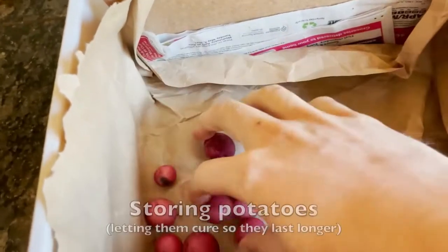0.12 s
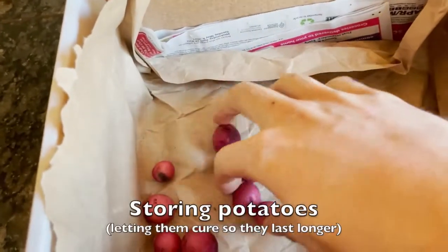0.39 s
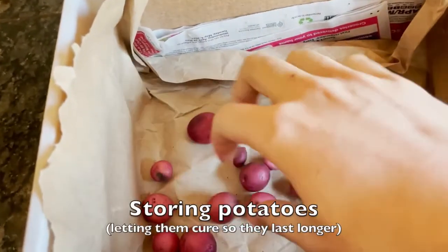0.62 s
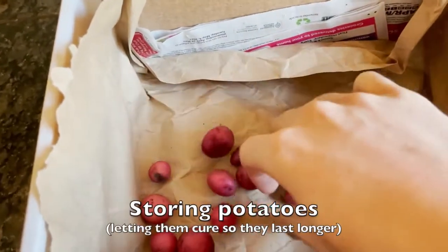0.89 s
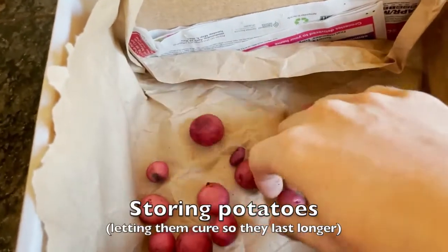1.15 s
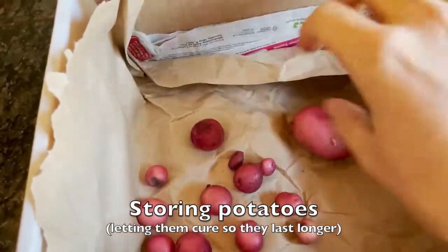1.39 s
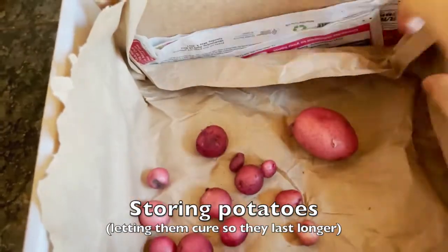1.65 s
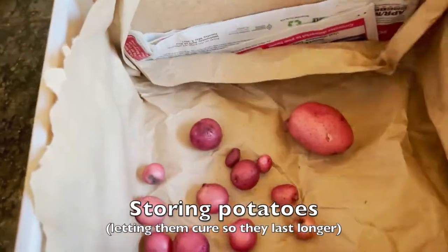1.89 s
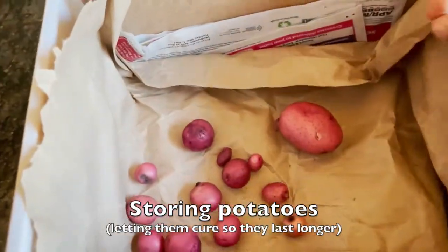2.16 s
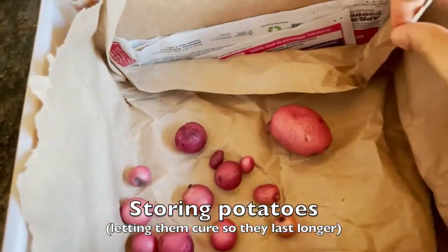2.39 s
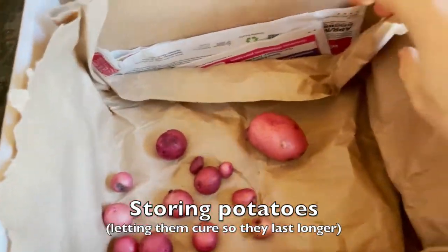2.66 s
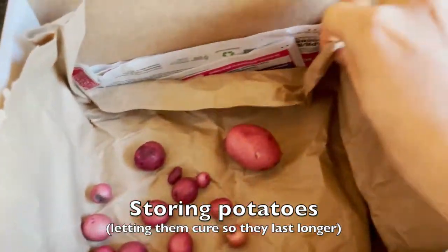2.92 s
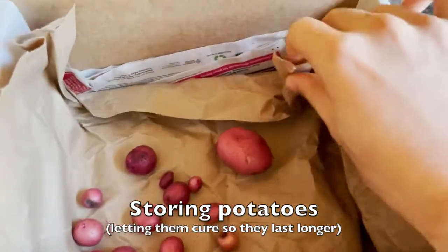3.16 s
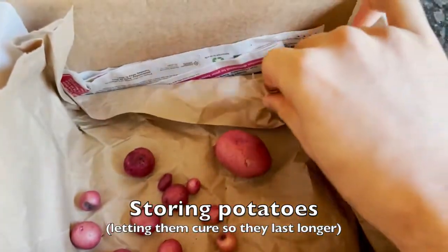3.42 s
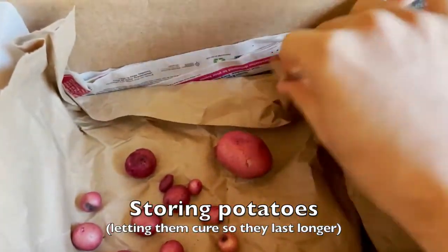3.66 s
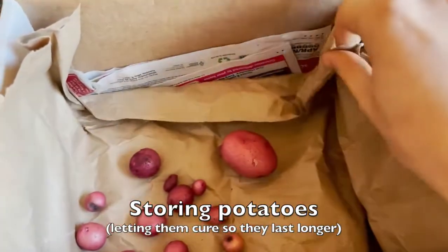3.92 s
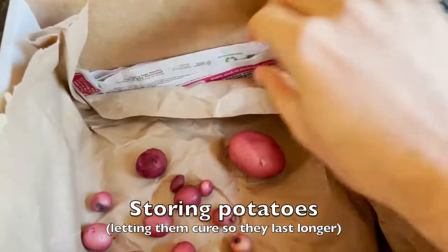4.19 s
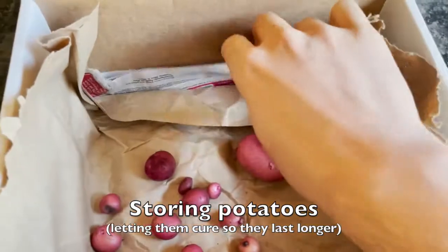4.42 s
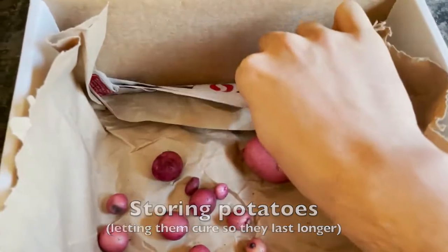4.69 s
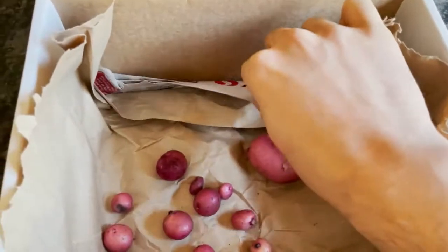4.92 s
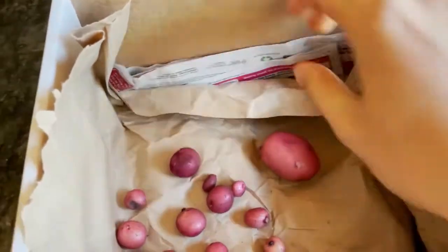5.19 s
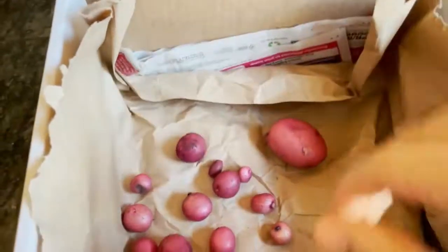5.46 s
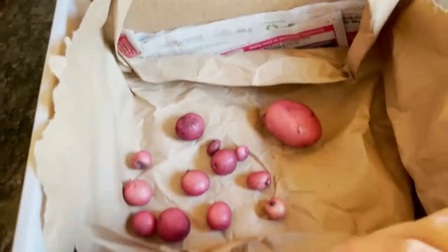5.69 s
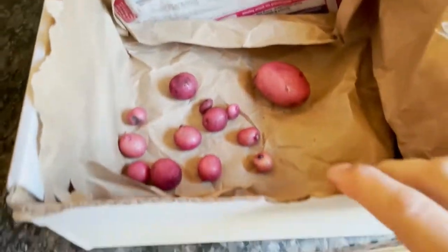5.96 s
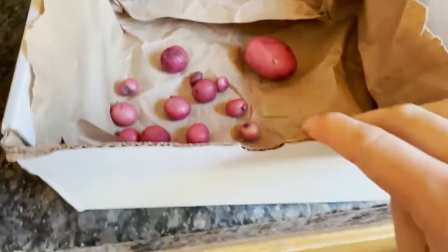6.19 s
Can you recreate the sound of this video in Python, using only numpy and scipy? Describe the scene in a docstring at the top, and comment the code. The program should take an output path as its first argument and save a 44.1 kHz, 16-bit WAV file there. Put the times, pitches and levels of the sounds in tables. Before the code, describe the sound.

Very close indoor sound of a hand working in a paper-lined cardboard box, over low, steady kitchen noise. From 0 to 1.4 s there is a brief brush of paper, then light ticks and small pitched taps as little potatoes are shifted, with a crisp snap near 0.45. After a near pause, bright crackles and a dull drag burst at 1.6-1.75. Rustling continues from 1.8 to 3.4, with sharp snaps at 2.4 and 2.7, a low thump at 3.0 and a tight cluster of crackles to 3.35. It dips around 3.55, then rustle returns with a snap at 3.9. From 4.2 to 4.7 come rumbling drags and hollow knocks, strongest at 4.44. The loudest woody knock lands at 5.05, followed by quick small bumps to 5.15. Then it quiets: soft taps at 5.6, gentle rubbing until 6, faint hiss at the end.

```python
"""Potatoes in a paper-lined box

A hand shifts small potatoes and folds the stiff paper lining of a cardboard box, close to a phone indoors.
Creases snap as noise bursts through resonances; knocks are short pushes that ring panel and box.
Rustle, rubbing and drag are dense random grains under the hand's gestures; jolts are low filtered noise.
A short room tail follows snaps and knocks; behind lie a quiet kitchen's steady noise and a late airy hiss."""
import sys
import numpy as np
from scipy import signal
from scipy.fft import rfft, irfft, next_fast_len
from scipy.io import wavfile
from scipy.ndimage import uniform_filter1d

SR = 44100
rng = np.random.default_rng(int(sys.argv[2]) if len(sys.argv) > 2 else 0)


def wav_out(sig):
    """Save sig, one row per channel (or a flat mono array), as 16-bit PCM at SR to the path in sys.argv[1]."""
    wavfile.write(sys.argv[1], SR, np.round(np.clip(np.atleast_2d(sig).T, -1, 1) * 32767).astype(np.int16))


def how_loud(loudness_db):
    """Turn decibels into a plain amplitude multiplier (0 dB gives 1, 20 dB gives 10)."""
    steps = np.asarray(loudness_db, float) / 20
    return 10 ** steps


N = 279153  # length in samples
T = np.arange(N) / SR
SIZE = next_fast_len(N + SR)
HZ = np.arange(SIZE // 2 + 1) * SR / SIZE


def on_log(table, hz):
    """Logarithmic pitch scale: reads an (f/Hz, value) table on a log-frequency axis."""
    f, v = np.transpose(table)
    return np.interp(np.log(hz + 1), np.log(f + 1), v)


def shape(x, response):
    """Linear filtering: multiplies the spectrum of the whole sound by a frequency response."""
    return irfft(rfft(x, SIZE) * response, SIZE)[..., :N]


def ring(hz, width, f=HZ):
    """Damped simple resonator: its response, with gain 1 at the centre."""
    return 1j * width * f / (hz ** 2 - f ** 2 + 1j * width * f)


def unit(x):
    """Root-mean-square normalisation: scales to rms 1."""
    return x / np.sqrt(np.mean(x ** 2))


def walk(rate):
    """Slow random modulation: levels held for 1 / rate s and slewed, at rms 1."""
    k = int(SR / rate)
    held = np.repeat(rng.standard_normal(N // k + 1), k)
    return unit(uniform_filter1d(held, k)[:N])


# likeness of the two channels: (f/Hz, coherence from 0 to 1)
LIKENESS = [(60, .995), (300, .99), (600, .55), (1400, .72), (2000, .93), (2700, .55), (3700, .75),
            (4600, .5), (5800, .88), (7000, .998), (8200, .998), (9200, .88), (11300, .9), (12800, .72),
            (13400, .998), (14700, .998), (16000, .9)]


def spread(make):
    """Interchannel coherence: two draws of a source become mid and side, balanced at each frequency."""
    c = np.clip(on_log(LIKENESS, HZ), 0, 1)
    mid = shape(make(), np.sqrt((1 + c) / 2))
    side = shape(make(), np.sqrt((1 - c) / 2))
    return np.array([mid + side, mid - side])


SLIP_SCATTER_DB, SLIP_MS = 1.7, 3.0  # scatter of the slips, decay time of one slip
SWELL_DB = 1.0  # slow drift of the slip noise


def grains(rate, scatter_db, ms):
    """Stick-slip friction: noise jumps at each tiny slip of the fibres and dies away in a few ms."""
    slips = (rng.random(N) < rate / SR) * how_loud(scatter_db * rng.exponential(size=N))
    fade = np.exp(-1000 / (ms * SR))
    envelope = signal.lfilter([1], [1, -fade], slips)
    return unit(rng.standard_normal(N) * envelope)


def swelling_grains(rate):
    """Modulated friction: slip noise whose level drifts slowly."""
    return grains(rate, SLIP_SCATTER_DB, SLIP_MS) * how_loud(SWELL_DB * walk(25))


def curves(table):
    """Linear interpolation: the columns of a (t/s, value, ..) table, sample by sample."""
    s, *columns = np.transpose(table)
    return [np.interp(T, s, c) for c in columns]


EDGE_DB = 35  # how far an event has sunk at the ends of its length
ROUNDNESS = 1.26  # 1 = pointed peak, 2 = round top with sudden ends


def swells(s, length, db, rise, bed_db):
    """Power addition: gain of a bed plus events that climb to a peak and sink; rise = share of the length."""
    t, power = T[::32], 0
    for at, span, top in zip(s, length, db):
        late = (t - at) / max(span, .02)
        distance = np.maximum(-late / rise, late / (1 - rise))
        power = power + how_loud(2 * top - 2 * EDGE_DB * distance ** ROUNDNESS)
    return np.sqrt(how_loud(2 * bed_db) + np.interp(T, t, power))


def follow(grip_db, at_60_db, slope):
    """Power law: a bed of level at_60_db at a grip of -60 dB, changing by slope dB per dB of grip."""
    return at_60_db + slope * (grip_db + 60)


def add(out, s, sound):
    """Superposition: mixes a short sound in at s seconds."""
    i = int(s * SR)
    out[..., i:i + sound.shape[-1]] += sound[..., :N - i]


BEND_MS = 1.518  # travel time of a 1 kHz bending wave through the cardboard


def bending(f, first_hz):
    """Dispersion of bending waves: treble arrives first; delays count from the arrival of first_hz."""
    low = np.minimum(f, first_hz)
    turns = BEND_MS / 1000 * (2 * np.sqrt(1000 * low) - low * np.sqrt(1000 / first_hz))
    return np.exp(-2j * np.pi * turns)


TICK_DB, TICK_MS = 11.5, 1.157  # main break inside a snap: mean level over the splinters, delay
SNAP_FADE_MS, SPLINTER_DB = 1.92, 2.5  # main decay time, scatter of the tiny cracks in one snap
# creases snapping: (t/s, sheet level/dB, sheet f/Hz, body level/dB, sizzle level/dB)
SNAPS = [(0.063, -55, 2000, -63, -50.5), (0.3072, -56, 1150, -81, -84), (0.3278, -44, 1310, -46, -50.5),
         (0.41, -68, 1780, -61, -54), (0.4639, -32, 3240, -42, -33.5), (0.492, -54, 1100, -69, -59),
         (0.5195, -55, 5600, -70, -73), (0.622, -57.5, 1180, -62, -62), (0.6604, -81, 4580, -76, -56),
         (0.7071, -51, 1020, -45.5, -66), (0.733, -75, 4800, -75, -53.5), (0.758, -66, 1173, -58, -53),
         (0.7806, -47.5, 1300, -49, -68), (0.818, -65, 2660, -74, -54), (0.859, -72, 2500, -73, -59),
         (0.9109, -49, 1080, -45.5, -61), (0.947, -61, 1710, -76, -72), (1.045, -60.5, 1830, -62.5, -55),
         (1.1193, -83, 4840, -73, -57.5), (1.1465, -61, 5050, -65, -53.5), (1.1742, -67, 6100, -84, -59),
         (1.1986, -67, 1210, -78, -58), (1.2538, -60.5, 1150, -46.5, -86), (1.279, -71, 3300, -83, -71),
         (1.39, -90, 3000, -83, -71), (1.431, -71, 3300, -77, -67), (1.4507, -71, 3400, -96.5, -62),
         (1.472, -74, 5500, -76, -64.5), (1.498, -55, 2300, -79, -55), (1.585, -42.5, 3100, -62, -67),
         (1.6555, -34, 2380, -43.5, -33.5), (1.7, -33.5, 2280, -56, -29), (1.7074, -33.5, 1090, -66, -44),
         (1.782, -65, 2500, -66, -61), (2.129, -54, 2900, -59, -66), (2.4003, -29, 3500, -94, -67),
         (2.475, -59, 4710, -47.5, -49), (2.4893, -46.5, 2660, -45.5, -68.5),
         (2.5458, -43.5, 1900, -62, -47.5), (2.636, -55.5, 2500, -73, -51), (2.6895, -29, 2100, -38, -27),
         (2.695, -41, 2000, -42, -37), (2.721, -57, 1216, -67, -48), (2.795, -47, 1430, -60, -83),
         (2.8235, -43.5, 2280, -46, -69), (2.848, -49, 5340, -52, -64), (2.9145, -34.5, 2120, -45, -34),
         (2.9805, -39.5, 1120, -58, -55), (3.0849, -41.5, 1640, -47, -60), (3.1134, -36, 1760, -45, -48),
         (3.142, -33.5, 2470, -37, -30.5), (3.1435, -33.5, 1210, -43, -48), (3.1711, -33.5, 1650, -36, -55),
         (3.1875, -36, 1980, -50, -38.5), (3.189, -37, 5000, -53, -45), (3.2117, -55, 1150, -43, -44.5),
         (3.228, -43.5, 1600, -57, -50), (3.303, -40, 1900, -41, -55), (3.3228, -26.5, 1450, -29.5, -42),
         (3.385, -42, 2400, -51, -78), (3.387, -41, 1480, -45, -74), (3.4353, -52, 1300, -70, -76),
         (3.5075, -66, 1220, -52, -64), (3.6207, -56, 1210, -60, -73), (3.6424, -70, 1360, -44.5, -47.5),
         (3.8372, -39.5, 1220, -44, -74), (3.8866, -28, 2680, -43, -29.5), (4.087, -43, 1400, -43, -76),
         (4.2328, -72, 990, -46, -57), (4.267, -53, 1100, -40, -50), (4.283, -61, 1500, -44, -60),
         (4.303, -46, 2300, -42.5, -56), (4.347, -42, 2700, -41, -50), (4.354, -51, 2900, -59, -55),
         (4.4087, -50, 2300, -49, -68), (4.4367, -39.5, 895, -41.5, -59), (4.5215, -45.5, 2250, -75, -73),
         (4.5276, -42, 1210, -68, -38.5), (4.5674, -47, 1200, -66, -57), (4.5995, -47, 2380, -67, -64),
         (4.7215, -48, 1900, -51.5, -65), (4.8943, -61.5, 2420, -65, -59.5), (4.916, -64, 2360, -69, -71.5),
         (4.9691, -52.5, 1620, -74, -50.5), (5.0516, -33, 2120, -23.5, -60), (5.0525, -32, 2100, -37, -63),
         (5.1018, -51, 1120, -39, -53), (5.308, -69.5, 5500, -83, -68), (5.5832, -54, 3230, -58, -60),
         (5.591, -60, 3280, -64, -62), (5.927, -58, 1950, -78, -64), (5.9692, -62, 4860, -63.5, -80),
         (6.064, -70, 2500, -87.5, -79), (6.074, -67, 5000, -82.5, -80)]


def snaps():
    """Impulsive excitation of resonators: each crease lets go in a few ms and rings the sheet near its pitch."""
    out, t = np.zeros(N), np.arange(2048) / SR
    f = np.arange(1025) * SR / 2048
    fade = np.exp(-1000 * t / SNAP_FADE_MS) + how_loud(-3.0) * np.exp(-t / 0.0069)
    envelope = (1 - np.exp(-t / 0.00023)) ** 2 * fade
    body = (ring(772, 1100, f) ** 4 + how_loud(-4.0) * ring(1022, 400, f) ** 2) * bending(f, 1600)
    sizzle = ring(6000, 5700, f) ** 2 + how_loud(-13.5) * ring(12200, 4900, f) ** 2
    for s, sheet_db, hz, body_db, sizzle_db in SNAPS:
        cracks = how_loud(SPLINTER_DB * np.repeat(np.minimum(rng.exponential(size=128), 3), 16))
        splinters = rfft(envelope * cracks * rng.standard_normal((3, 2048)))
        tick_gain = how_loud(TICK_DB + 2.5 * rng.standard_normal())
        tick = tick_gain * np.exp(-2j * np.pi * f * TICK_MS / 1000)
        sheet = ring(hz, 0.5 * hz, f) ** 2 + how_loud(-9.0) * ring(2200, 2500, f) ** 2
        parts = irfft((splinters + tick) * [sheet, body, sizzle])
        # levels refer to the loudest 128 samples of each part
        parts /= np.sqrt(np.max(uniform_filter1d(parts ** 2, size=128), axis=1, keepdims=True))
        add(out, s, how_loud([sheet_db, body_db, sizzle_db]) @ parts)
    return out


# box walls and cavity: (f/Hz, width/Hz, level/dB)
BOX = [(190.6, 21, 3.5), (272, 41, -0.5), (343, 160, -2), (406, 44, -1), (669, 44, -0.5), (780, 28, -7.5),
       (1120, 98, -19.5)]


def box(f):
    """Modal superposition: the cardboard's resonances together."""
    return sum(how_loud(db) * ring(hz, width, f) for hz, width, db in BOX)


CONTACT_CYCLES = 0.49  # a push lasts for this part of the struck resonance's period
# knocks on the box, and short pitched ticks within some snaps:
# (t/s, peak level/dB, panel or tick f/Hz, nominal ring T60/s, whole-box relative level/dB)
KNOCKS = [(0.246, -49.5, 342, 0.11, -24), (0.334, -46.5, 287, 0.1, -13.5), (0.78, -34.5, 1160, 0.0085, -19),
          (0.911, -40, 1350, 0.0049, -20), (1.599, -40.5, 324, 0.068, 2), (1.71, -28.5, 226, 0.029, -7),
          (2.492, -40, 291, 0.12, -4.5), (2.919, -40, 272, 0.039, -5), (2.9828, -21.5, 228, 0.042, -12),
          (2.999, -29, 151, 0.24, 13), (3.3231, -23, 1070, 0.007, -27), (3.324, -39.5, 385, 0.084, -9),
          (3.329, -29.5, 450, 0.057, 8.5), (3.386, -27.5, 1900, 0.0087, -12), (3.801, -36, 157, 0.085, -4),
          (3.845, -37, 414, 0.023, -32), (3.889, -34.5, 239, 0.15, -4), (4.235, -32, 367, 0.066, -15),
          (4.263, -30.5, 302, 0.08, -11), (4.295, -31.5, 300, 0.084, -9), (4.347, -33.5, 191, 0.13, -5.5),
          (4.4375, -28, 780, 0.012, -24), (4.439, -15.5, 315, 0.036, 1.5), (4.532, -27.5, 297, 0.048, -9.5),
          (4.571, -38.5, 300, 0.046, -4), (4.608, -38.5, 286, 0.072, -15.5),
          (5.0525, -14.5, 843, 0.0084, -14), (5.053, -7, 327, 0.029, 3), (5.084, -36.5, 302, 0.029, -8),
          (5.099, -33.5, 277, 0.024, -2.5), (5.109, -29.5, 234, 0.03, -11), (5.117, -31, 263, 0.04, -1.5),
          (5.126, -34, 330, 0.03, -9), (5.135, -30, 270, 0.025, 0), (5.145, -35, 262, 0.054, -6),
          (5.585, -36.5, 346, 0.056, -1.5), (5.594, -38, 82.5, 0.058, -31), (5.688, -55, 344, 0.084, -23),
          (5.935, -50.5, 467, 0.04, 12)]


def knocks():
    """Forced vibration: a short push rings a panel, or a snap's pitched tick, and the whole box."""
    out, t = np.zeros(N), np.arange(8192) / SR
    f = np.arange(4097) * SR / 8192
    for s, peak_db, hz, t60, box_db in KNOCKS:
        push = np.sin(np.pi * np.clip(t * hz / CONTACT_CYCLES, 0, 1)) ** 2
        width = 2 * np.log(1000) / (np.pi * max(t60, .01))
        # panel and enclosed air are coupled: the squared resonance swells before it dies
        struck = ring(hz, width, f) ** 2
        whole = how_loud(box_db) * box(f) * ring(546, 490, f)
        boom = irfft(rfft(push) * bending(f, 3.3 * hz) * (struck + whole))
        add(out, s, how_loud(peak_db) * boom / np.max(np.abs(boom)))
    return out


FOLD_DB, CRINKLE_DB, FOLD_TOP_DB = 5.5, 3.5, 10  # slow and quick flicker of a resonance; its highest rise
FLAT_DB = -6  # rustle heard between the sheet's resonances
HISS_SCATTER_DB = 2.8  # scatter of the finest slips
# colour of the paper noise: (f/Hz, spectral level/dB)
PAPER = [(710, 2), (1200, -1), (1920, 1.5), (2390, 4.5), (7740, 3.5), (9850, -8), (11200, -8), (15100, -14),
         (16000, -3.5), (16500, -24.5)]
# resonances of the lining: (f/Hz, width/Hz, level/dB before flicker)
SHEET = [(1100, 280, -14.5), (1600, 400, -10.5), (2100, 360, -8), (2620, 250, -12.5), (3000, 140, -10),
         (3530, 90, -14), (4680, 350, -13), (5130, 440, -14), (6100, 330, -20.5)]
# finger strokes over the paper: (peak t/s, length/s, rustle level/dB, fine hiss level/dB)
STROKES = [(0.146, 0.24, -49, -48.5), (0.25, 0.17, -59, -58), (0.372, 0.52, -66, -64),
           (0.536, .3, -64.5, -63), (0.938, 0.29, -65, -61), (1.159, 0.34, -70, -69),
           (1.298, 0.16, -72.5, -72), (1.615, 0.15, -51, -56), (1.693, 0.52, -49.5, -48.5),
           (2.013, 0.35, -54, -59), (2.075, 0.16, -50.5, -50), (2.215, 0.55, -49, -54.5),
           (2.5, 0.8, -51, -55), (2.719, 0.26, -45.5, -47), (2.852, 0.13, -45.5, -47),
           (2.933, 0.56, -49, -52), (3.098, 0.13, -52, -49), (3.191, 0.19, -44, -50),
           (3.275, 0.22, -54, -60), (3.53, 0.078, -69, -65), (3.752, 0.53, -51.5, -54.5),
           (3.94, 0.12, -75, -54), (4.036, 0.063, -51, -49), (4.311, 0.15, -46, -44.5),
           (4.339, 0.084, -46, -48), (4.428, 0.077, -51, -57), (4.48, 0.18, -56.5, -70),
           (4.562, 0.27, -50.5, -53), (4.633, 0.38, -53, -59), (4.883, 0.14, -75, -74),
           (5.094, 0.18, -49, -54.5), (5.122, 0.12, -49, -52.5), (5.28, 0.2, -64, -62.5),
           (5.69, 0.14, -61, -64.5), (5.767, 0.32, -57, -60.5), (5.87, 0.17, -60, -68),
           (5.987, 0.16, -61, -65)]


def strokes(grip_db):
    """Friction noise through changing modes: paper rustles in dense grains, with a finer hiss above."""
    s, length, rustle_db, hiss_db = np.transpose(STROKES)
    colour = how_loud(on_log(PAPER, HZ))
    dull = 1 / (1 + (HZ / 7500) ** 8)
    # as folds form and flatten, each resonance of the sheet comes and goes on its own
    folds = []
    for _, _, db in SHEET:
        flicker = FOLD_DB * walk(18) + CRINKLE_DB * walk(120)
        folds.append(how_loud(db + np.minimum(flicker, FOLD_TOP_DB)))

    def rustling():
        """Time-varying modal sum: slip noise heard directly and through the sheet's resonances."""
        x = shape(swelling_grains(1200), colour * dull)
        modes = sum(gain * shape(x, ring(hz, width) ** 2) for gain, (hz, width, _) in zip(folds, SHEET))
        return unit(how_loud(FLAT_DB) * x + modes)

    rustle = spread(rustling)
    hiss = spread(lambda: unit(shape(grains(1100, HISS_SCATTER_DB, SLIP_MS), colour * (1 - dull))))
    rise = 0.51
    return (swells(s, length, rustle_db, rise, grip_db) * rustle
            + swells(s, length, hiss_db, rise, follow(grip_db, -61.5, 1)) * hiss)


# paper dragged on the cardboard: (peak t/s, length/s, rumble level/dB, dull rubbing level/dB)
DRAGS = [(0.163, 0.11, -71, -53.5), (0.246, 0.23, -57.5, -58.5), (0.39, 0.13, -60, -85),
         (0.522, 0.24, -56, -73), (0.771, 0.14, -56.5, -83), (0.95, 0.24, -60, -79),
         (1.067, 0.13, -62, -83), (1.263, 0.24, -66, -94), (1.506, 0.076, -52.5, -85),
         (1.596, 0.19, -50.5, -75), (1.731, 0.12, -36.5, -59), (1.885, 0.32, -46, -55.5),
         (1.994, 1, -50.5, -84), (2.352, 0.25, -50, -63), (2.543, 0.068, -53, -46), (2.729, 0.12, -50, -48),
         (2.835, 0.086, -46, -64), (3.01, 0.85, -51, -54), (3.186, 0.54, -50.5, -47),
         (3.315, 0.19, -57, -48), (3.393, 0.059, -61, -51), (3.476, 0.94, -66, -62),
         (3.639, 0.12, -75, -46.5), (3.73, 0.24, -58, -51.5), (3.777, 0.33, -55, -64),
         (4.251, 0.069, -37, -45.5), (4.29, 0.16, -33, -42), (4.32, 0.11, -40.5, -96),
         (4.43, 0.26, -44.5, -58), (4.55, 0.19, -41.5, -50.5), (4.608, 0.11, -52, -46.5),
         (4.68, 0.44, -54.5, -55.5), (5.023, 0.27, -60, -55), (5.124, .12, -40.5, -42.5),
         (5.182, 0.83, -49.5, -62), (5.332, 0.93, -70, -69.5), (5.714, 1, -64.5, -72)]


def drags(grip_db):
    """Friction-driven panels: dragged paper rubs dully and its slips drive the box into a rumble."""
    s, length, rumble_db, rub_db = np.transpose(DRAGS)
    rub = spread(lambda: unit(shape(swelling_grains(900), ring(790, 1700) ** 2)))
    cavity = box(HZ) * ring(240, 280)
    rumble = spread(lambda: unit(shape(grains(1900, SLIP_SCATTER_DB, 2 * SLIP_MS), cavity)))
    rise = 0.46
    return (swells(s, length, rub_db, rise, follow(grip_db, -68, 0.35)) * rub
            + swells(s, length, rumble_db, rise, follow(grip_db, -61.5, 0.64)) * rumble)


# jolts of the table under the box: (peak t/s, length/s, level/dB before the last filter)
JOLTS = [(0.095, 0.17, -78), (0.256, 0.35, -52.5), (0.544, 0.77, -53.5), (1.796, 0.74, -52.5),
         (1.923, 0.13, -45.5), (2.224, 0.26, -50), (2.36, 0.28, -49.5), (2.853, 0.14, -52),
         (3.005, 0.2, -42), (3.2, 0.24, -51), (3.347, 0.2, -51.5), (3.804, 0.35, -54), (4.126, 0.19, -53),
         (4.33, 0.29, -42), (4.564, 0.077, -50), (5.132, 0.24, -44.5), (5.65, 0.14, -55),
         (5.755, 0.088, -60)]


def jolts(grip_db):
    """Low-frequency resonance: the shaken table is noise through low resonators, alike in both channels."""
    s, length, db = np.transpose(JOLTS)
    table = ring(94.5, 56) ** 2 + how_loud(-13.0) * ring(57, 23) ** 2
    shake = unit(shape(rng.standard_normal(N), table))
    last_filter = ring(83, 140) ** 2 * HZ ** 2 / (HZ ** 2 + 40 ** 2)
    gain = swells(s, length, db, 0.34, follow(grip_db, -62.5, 0.33))
    return gain * shape(shake, last_filter)


# how firmly the hand works the paper: (t/s, steady rustle level/dB)
GRIP = [(0.04, -86), (0.08, -68), (0.85, -71.5), (1.0, -78), (1.33, -100), (1.41, -111), (1.47, -81),
        (1.52, -69.5), (1.76, -53.5), (1.97, -50.5), (2.1, -60), (3.28, -57.5), (3.48, -75.5), (3.58, -96),
        (3.67, -64), (4.03, -55), (4.22, -86.5), (4.245, -59.5), (4.65, -66.5), (4.8, -85.5), (4.95, -72),
        (4.985, -57.5), (5.1, -63), (5.19, -78), (5.43, -101.5), (5.57, -99), (5.6, -72.5), (5.93, -72),
        (6.1, -82.5), (6.33, -78)]


def hand():
    """Common excitation: one grip sets the steady beds under strokes, drags and jolts."""
    grip_db = curves(GRIP)[0]
    return strokes(grip_db) + drags(grip_db) + jolts(grip_db)


ROOM_T60_S, ROOM_DB = 0.44, -15.5


def room(x):
    """Reverberation: a dense, exponentially decaying noise tail, different in each channel."""
    t = np.arange(SR // 2) / SR
    tail = spread(lambda: rng.standard_normal(N))[:, :len(t)]
    tail = tail * np.exp(-np.log(1000) * t / ROOM_T60_S)
    tail *= 1 - np.exp(-t / 0.0015)
    response = rfft(unit(tail) / np.sqrt(len(t)), SIZE)
    return shape(x, response / (1 + 1j * HZ / 5000))


def air(response):
    """Filtered random noise: steady noise of one colour, spread over two channels at rms 1."""
    return spread(lambda: unit(shape(rng.standard_normal(N), response)))


# late faint airy hiss around 4 kHz: (t/s, level/dB, upper band level/dB)
LATE_HISS = [(5.1, -100, -105), (5.3, -78, -94), (5.6, -75.5, -89), (6.0, -83, -84), (6.33, -74.5, -81)]


def late_hiss():
    """Band-filtered noise: a late faint airy hiss around 4 kHz, from noise through broad resonators."""
    low_db, high_db = curves(LATE_HISS)
    low = air(ring(3750, 550) ** 2 + how_loud(-7.0) * ring(2700, 1500) ** 2)
    high = air(ring(4200, 680) ** 2)
    return how_loud(low_db) * low + how_loud(high_db) * high


KITCHEN_DB = -64.5
# colour of the background: (f/Hz, relative level/dB)
KITCHEN = [(15, -34.5), (30, -14.5), (50, 1), (87, -3), (202, -16), (538, -24.5), (979, -21.5),
           (2000, -48.5), (2980, -46.5), (3600, -52), (15200, -61.5), (16500, -37)]


def kitchen():
    """Stationary background noise: room hiss and appliance rumble share one coloured noise."""
    return how_loud(KITCHEN_DB) * air(how_loud(on_log(KITCHEN, HZ)))


def scene():
    """Superposition: all sources, with the room answering the sharp ones."""
    hits = spread(snaps) + knocks()
    echo = how_loud(ROOM_DB) * room(hits.mean(axis=0))
    return hits + echo + hand() + late_hiss() + kitchen()


def band_limit(x):
    """A steep low-pass at the top of the band."""
    return signal.sosfilt(signal.butter(12, 16970, fs=SR, output="sos"), x)


# phase between left and right: (f/Hz, lead of the left/rad)
LEAD = [(0, 0), (500, -.2), (1500, -.4), (2000, 0), (3000, 1.4), (3800, .8), (4400, 1.5), (5100, 0),
        (6800, 2.5), (7100, 3.1), (8200, 3.2), (9800, 5.6), (11300, 6.3), (12300, 6.8), (13300, 9.3),
        (14700, 9.5), (15300, 10.8), (16500, 11.5)]
# level between left and right: (f/Hz, left minus right level/dB)
LEAN = [(200, 0), (380, .5), (700, 2.5), (1290, 2), (2380, -.5), (4400, .5), (8120, 0)]


def record(dry):
    """Stereo widening by fixed phase and level between left and right; the top is cut, peaks are rounded."""
    f, lead = np.transpose(LEAD)
    turn = np.exp(.5j * np.interp(HZ, f, lead)) * how_loud(on_log(LEAN, HZ) / 2)
    cut = 1 / (1 + (HZ / 16200) ** 80)
    heard = shape(dry, np.array([turn, 1 / turn]) * cut)
    return band_limit(np.tanh(2.145 * heard) / 2.85)


dry = scene()
out = record(dry)
wav_out(out)
```